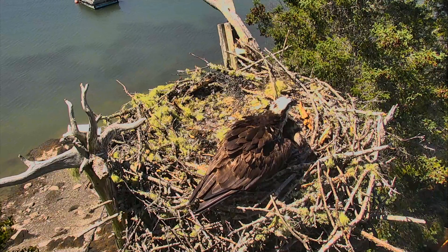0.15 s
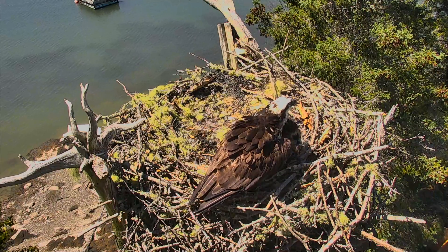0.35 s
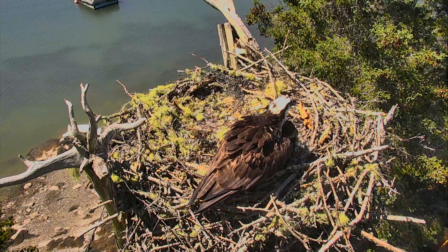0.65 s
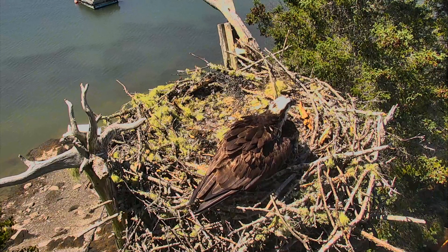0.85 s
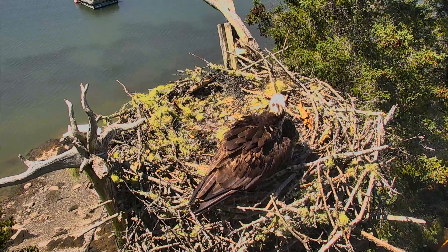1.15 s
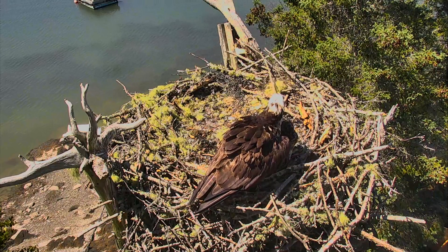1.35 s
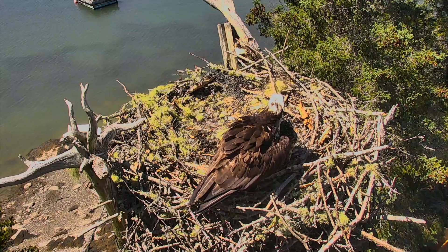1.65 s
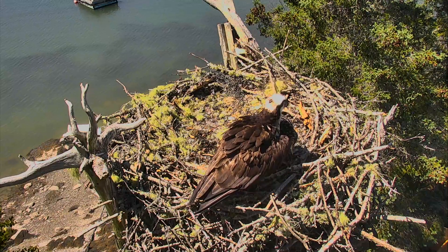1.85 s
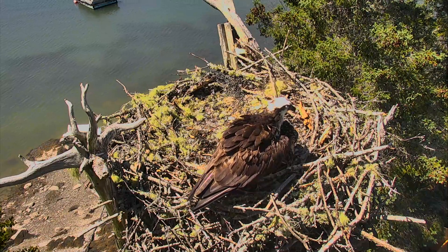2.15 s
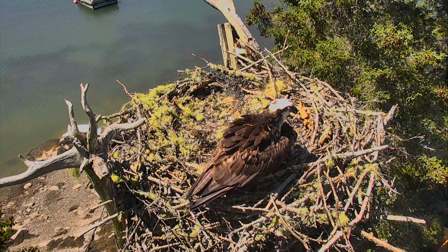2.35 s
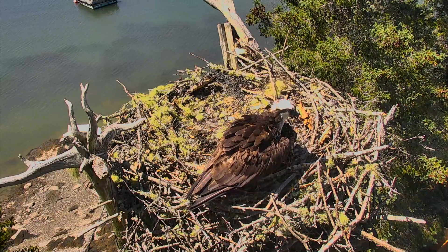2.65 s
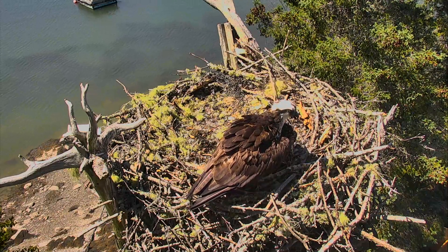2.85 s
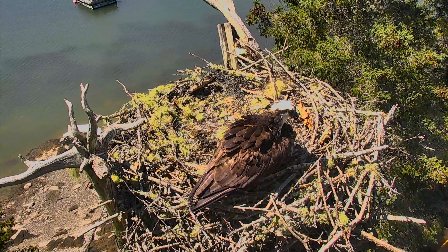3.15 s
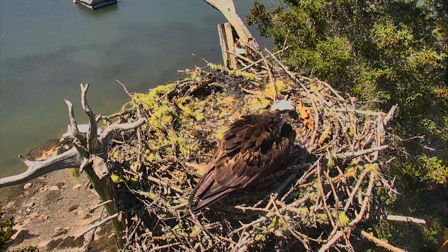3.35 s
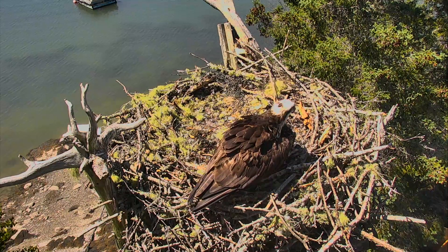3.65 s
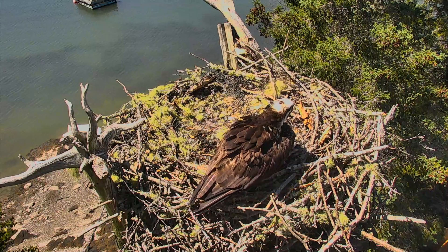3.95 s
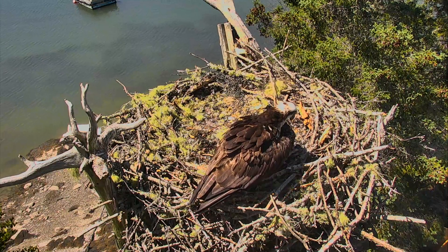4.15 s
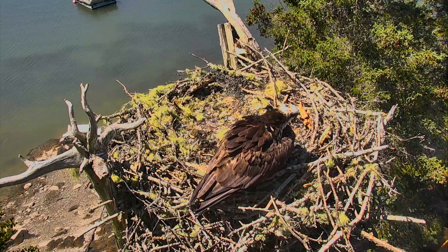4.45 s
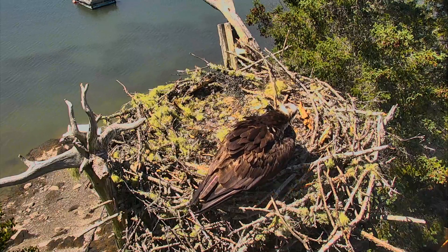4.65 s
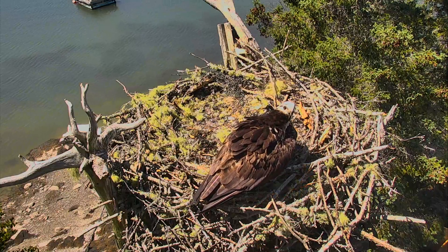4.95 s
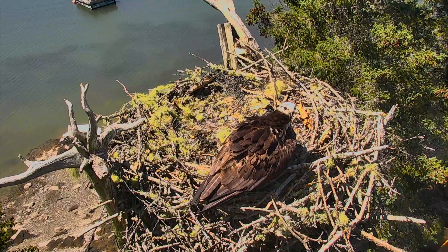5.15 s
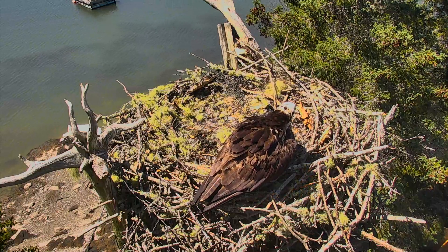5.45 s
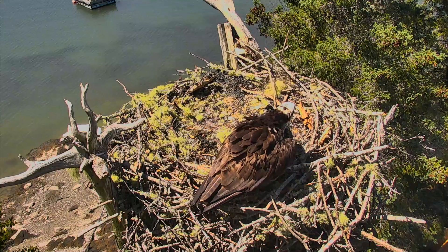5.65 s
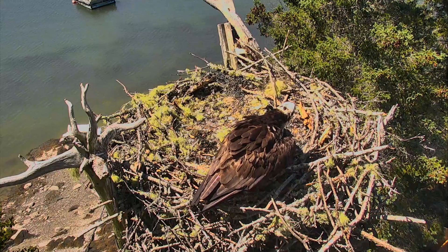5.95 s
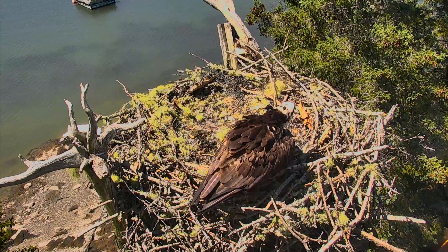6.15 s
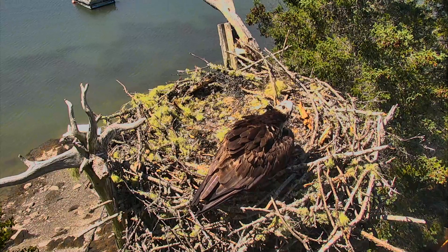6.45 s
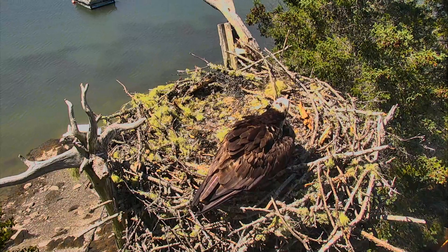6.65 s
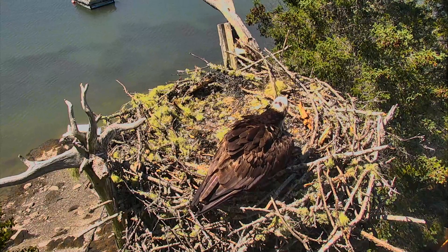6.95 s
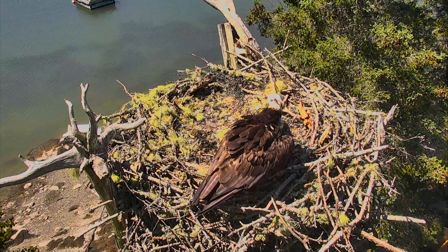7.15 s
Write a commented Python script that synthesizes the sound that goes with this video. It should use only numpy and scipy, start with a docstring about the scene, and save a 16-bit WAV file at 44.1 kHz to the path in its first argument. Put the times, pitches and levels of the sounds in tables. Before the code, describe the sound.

Close outdoors, an osprey on its stick nest calls about four times a second throughout. Each call pairs a brief soft reedy note that breaks upward with a louder, sharp whistle less than a tenth of a second later. The first calls are weak, then they grow loud, piercing and rougher. A crisp short echo follows each one, over faint low hum, soft air and light wind.

```python
"""An osprey on its nest above the shore calls about four times a second, with unevenly growing strain.
Each call is a soft harmonic tone that breaks upward, a click of shaped noise, and a loud whistle that
swells twice as its pitch crosses a throat resonance; hiss and thin sliding squeaks join in.
Delays and decaying noise give one clear echo, two much fainter later ones and a short tail; drifting
sines make a low hum, coloured noise the air, wind and nest rustle, and faint sliding tones the far birds."""
import sys
import numpy as np
from scipy import signal
from scipy.fft import rfft, irfft
from scipy.io import wavfile
from scipy.ndimage import uniform_filter1d

SR = 44100
rng = np.random.default_rng(int(sys.argv[2]) if len(sys.argv) > 2 else 0)


def pcm_store(signal):
    """Save signal as 16-bit PCM."""
    levels = np.round(np.clip(np.atleast_2d(signal), -1, 1) * 32767)
    wavfile.write(sys.argv[1], SR, levels.astype(np.int16).T)


N = 321489
TIME = np.arange(N) / SR

# Partials of the hum. Each row: frequency in Hz, level at mid-scene in dB.
HUM = [(29.5, -52), (58.3, -48), (117.3, -47), (142, -57.5), (173, -53), (199, -65), (237, -60.5),
       (255, -57), (361, -59), (451, -61)]
# Spectrum of still air. Each row: frequency in Hz, relative density in dB per Hz.
AIR = [(20, -2), (45, -6), (80, -2), (130, 0), (240, -1), (400, -9), (600, -16.5), (1000, -21.5),
       (1500, -26), (2500, -33), (4500, -40.5), (9000, -44.5), (13000, -49), (17000, -51.5)]
# Spectrum of wind noise. Each row: frequency in Hz, relative density in dB per Hz.
WIND_COLOUR = [(15, -1), (30, 7.5), (50, -6), (90, -17.5), (300, -65)]
# Gusts of wind. Each row: centre in seconds, length in seconds, peak level in dB.
GUSTS = [(1.38, .2, -46), (5.22, 0.13, -40), (6.82, 0.17, -37), (7.18, 0.47, -39.5)]
# Strain of the voice, limited to 0-1 in use. Each row: time in seconds, roughness as a fraction.
STRAIN = [(0, 0), (.5, 0.27), (1.1, 0.29), (2, 0.19), (4, 0.2), (4.85, 0.53), (5.15, 0.22), (5.8, 0.39),
          (6.5, 1.01), (6.95, 0.28), (7.29, 0.81)]
# Soft notes. Each row: start in seconds, length in seconds, starting pitch in Hz,
# nominal level before the break in dB, nominal level after it in dB.
SOFT_NOTES = [(0.121, 0.055, 1458, -33, -60), (0.411, 0.028, 1450, -43.5, -55),
              (0.694, 0.031, 1509, -29, -33), (.957, 0.032, 1535, -29, -22.5),
              (1.216, 0.022, 1430, -29.5, -61), (1.492, .029, 1455, -29.5, -48),
              (1.765, .031, 1509, -26, -22.5), (2.04, .037, 1585, -24.5, -26),
              (2.286, .035, 1576, -23.5, -20.5), (2.531, 0.035, 1629, -24, -23),
              (2.778, 0.039, 1635, -23.5, -26), (3.024, 0.036, 1628, -24, -21.5),
              (3.283, 0.036, 1550, -25, -21), (3.535, 0.037, 1617, -23.5, -23.5),
              (3.795, .038, 1614, -23.5, -25), (4.051, 0.032, 1596, -25.5, -22.5),
              (4.301, 0.038, 1620, -25.5, -21), (4.555, 0.034, 1687, -28, -14.5),
              (4.805, 0.036, 1675, -28.5, -15), (5.046, .036, 1636, -24, -20.5),
              (5.28, 0.037, 1730, -27, -14.5), (5.523, .033, 1690, -27, -20.5),
              (5.758, 0.034, 1780, -28, -17), (5.984, 0.038, 1813, -30, -16.5),
              (6.206, 0.042, 1860, -27, -17), (6.429, .046, 1868, -27, -17),
              (6.664, 0.037, 1690, -25.5, -13.5), (6.901, 0.032, 1622, -25.5, -18.5),
              (7.129, 0.043, 1780, -26, -17)]
# Growing boldness of the soft note. Each row: time in seconds, climb before the break in Hz per second,
# leap above the starting pitch in Hz, lag of the full voice in seconds, lift of the second harmonic in dB.
BOLDNESS = [(.15, 0, 716, 0.015, -2), (.5, 2000, 734, 0.0094, -1), (1, 7003, 742, 0.0045, 4),
            (2.1, 11501.5, 844, 0.0046, 4), (4.2, 11498.5, 954, .005, 6), (5.1, 11498.5, 1068, 0.0032, 2),
            (5.8, 13005, 1017, 0.0044, 9.5), (6.4, 14004, 1135, 0.0052, 5), (7.1, 12002, 1244, 0.0037, 4.5)]
# Overtone colour of the soft note. Each row: frequency in Hz, gain in dB.
SOFT_COLOUR = [(2800, -13.5), (3500, -17.5), (4300, -31), (5300, -15), (6800, -24.5), (7600, -30.5),
               (8700, -27), (10500, -54), (16500, -60)]
# Air noise that goes with the voice. Each row: frequency in Hz, relative density in dB per Hz.
RASP = [(500, -26), (1200, -22.5), (1700, -3.5), (2400, 6), (3500, 3.5), (4200, -16.5), (5500, -12.5),
        (7500, -9.5), (10200, -16), (11000, -24), (16500, -38)]
# Click that starts a note. Each row: frequency in Hz, relative density in dB per Hz.
CLICK = [(300, -20), (800, -0.5), (1200, -10.5), (1600, 7), (2700, 1.5), (4400, -26.5), (5400, -10.5),
         (7500, -31), (10000, -39), (16500, -41.5)]
# Echo paths. Each row: delay in seconds, gain before colouring in dB.
ECHOES = [(0.037, 0.5), (.0665, -18.5), (.083, -21.5)]
# Reflection from bank and trees. Each row: frequency in Hz, gain in dB.
ECHO_COLOUR = [(1000, -24.5), (1600, -24.5), (2300, -16.5), (2750, -22.5), (3050, -30.5), (3500, -24),
               (4600, -29), (6300, -30.5), (12000, -29.5)]
# Colour of the scattered tail. Each row: frequency in Hz, gain in dB.
TAIL_COLOUR = [(1000, -34), (2300, -24.5), (3000, -34), (3400, -28), (4300, -33.5), (5500, -21),
               (6100, -27), (6600, -19.5), (7600, -32), (12000, -35.5)]
# Hiss of air in the throat. Each row: frequency in Hz, relative density in dB per Hz.
HISS_COLOUR = [(3500, -22), (4800, -1), (5600, 0.5), (7000, -7.5), (9000, -19), (11500, -36), (16500, -50)]
# Loud whistles. Each row: first swell in seconds, its pitch in Hz, its nominal level in dB,
# delay to the second swell in seconds, pitch of the second swell in Hz.
LOUD_NOTES = [(0.203, 2134, -23, 0.0092, 2350), (.497, 2770, -23, .011, 2345),
              (0.7806, 2720, -16.5, 0.0084, 2460), (1.0432, 2973, -15.5, 0.013, 2860),
              (1.3017, 2807, -12.5, 0.013, 2484), (1.574, 2700, -12, 0.01, 2620),
              (1.846, 2837, -6, 0.0094, 2970), (2.12, 3047, -7.5, 0.013, 3103),
              (2.3655, 2856, -6, .01, 2980), (2.6085, 2980, -4.5, .013, 3124),
              (2.8573, 3078, -4, .013, 3136), (3.104, 3090, -7, 0.013, 3160),
              (3.365, 3040, -3.5, 0.013, 3100), (3.6124, 3093, -5, 0.013, 3160),
              (3.8754, 3046, -4.5, 0.012, 3105), (4.1281, 3020, -7, 0.014, 3091),
              (4.3824, 3097, -6.5, 0.014, 3070), (4.6326, 3093, -5.5, 0.014, 3154),
              (4.8876, 3206, -13.5, 0.013, 3310), (5.123, 3048, -3, .012, 3080),
              (5.3577, 3050, -2, 0.012, 3163), (5.598, 3040, -3, 0.013, 3174),
              (5.835, 3070, -8, 0.011, 3216), (6.06, 3120, -9.5, .011, 3154),
              (6.2849, 3105, -6, 0.012, 3140), (6.5097, 3270, -12.5, 0.012, 3043),
              (6.7495, 3190, -12.5, 0.01, 3217), (6.9784, 3210, -3, 0.013, 3180),
              (7.2093, 3326, -10, .016, 3344)]
# Changing shape of the whistle. Each row: time in seconds, overshoot of the pitch crest in Hz,
# width of the first swell in seconds, then in dB the nominal levels of the second swell and the crest,
# and the gains of the second harmonic and the higher harmonics.
WHISTLE_SHAPE = [(.2, 136, 0.011, -21.5, -32, -30, -59), (.5, 140, 0.0091, -29.5, -34, -19, -42.5),
                 (1.45, 261, .011, -20.5, -21.5, -21.5, -34),
                 (1.85, 331, 0.0063, -13.5, -29.5, -19.5, -39.5),
                 (2.7, 421, 0.006, -10.5, -33, -20.5, -42.5), (3.88, 400, 0.0051, -11, -32.5, -20, -36.5),
                 (4.12, 1255, 0.0042, -10.5, -34.5, -22, -30), (4.88, 1228, 0.0038, -13, -33.5, -20.5, -31),
                 (5.4, 1397, 0.0054, -10.5, -42, -20, -31.5), (6.25, 1369, 0.0038, -13.5, -30.5, -21, -29),
                 (7.2, 1323, 0.0044, -14.5, -32, -30.5, -27)]
# Throat resonance on the whistle's second harmonic. Each row: frequency in Hz, gain in dB.
OCTAVE_COLOUR = [(4400, -7), (5400, 3.5), (6000, -4), (6450, 3), (7100, -7.5), (9000, -8.5)]
# Colour of the whistle above its second harmonic. Each row: frequency in Hz, gain in dB.
WHISTLE_COLOUR = [(7000, -3.5), (8500, -4), (9400, -9), (10200, -8), (10900, -17), (12800, -18),
                  (14200, -24.5), (15300, -23.5), (17000, -22)]
# Envelope of a soft rustle. Each row: time in seconds, level in dB.
RUSTLE = [(.2, -91), (.29, -62), (.39, -66), (.47, -88)]
# Spectrum of dry nest material. Each row: frequency in Hz, relative density in dB per Hz.
RUSTLE_COLOUR = [(1000, -4), (2500, 1), (5000, -3.5), (10000, -6), (12000, -30), (17000, -24)]
# Twigs ticking in the nest. Each row: centre in seconds, level in dB.
TWIGS = [(4.982, -55.5), (5.421, -53), (5.49, -51)]
# Faint far hoot. Each row: start in seconds, length in seconds, first and last pitch in Hz, peak level in dB.
FAR_HOOT = [(1.495, 0.073, 760, 745, -49.5)]
# Far small bird. Each row: start in seconds, length in seconds, first and last pitch in Hz, peak level in dB.
FAR_BIRD = [(2.74, 0.091, 4430, 3740, -59), (4.484, 0.068, 4530, 3580, -57),
            (5.223, 0.051, 5450, 4860, -63.5)]

HUM_FADE_DB_PER_S = -.4   # the hum slowly recedes
BREEZE_DB, BREEZE_SWING_DB = -50.5, 2.5
# a soft note at the usual pitch breaks after this time; a higher one breaks sooner, by a power law
USUAL_HZ, BREAK_AFTER_S, BREAK_POWER = 1620, 0.016, 2.78
WARM_UP_S, COLD_LINGER = 0.26, 0.58   # the voice starts cold: its first note lingers before the break
SOFT_CLICK_DB, SOFT_CLICK_DB_PER_S = -32, 0.79   # grows through the bout
SOFT_CLICK_LEAD_S = .0015   # notes below the usual pitch click this much earlier
TAIL_T60_S = 0.39
HISS_LEAD_S, HISS_S, HISS_DB, HISS_STRAIN_DB = .011, 0.0076, -52, 13.5
CLICK_LEAD_S = 0.0113   # the click comes this long before the first swell
CLICK_DB, CLICK_DB_PER_HZ = -33.5, -0.0004   # weakens very slightly with the overshoot
# the resonance lifts mainly the fundamental, so weaker whistles are richer in harmonics
USUAL_WHISTLE_DB, WEAK_RICHNESS = -6, 0.66
SQUEAK_HZ, SQUEAK_SPREAD_DB = 5240, 3
SQUEAKS_FROM_S = 0.76   # the first, gentle calls have almost no squeak
# one squeak rises after the soft note and fades with strain; late in the bout it is fainter
RISING_AFTER_S, RISING_SLIDE_HZ, RISING_DB, RISING_STRAIN_DB = 0.011, 900, -34.5, -20
RISING_UNTIL_S, RISING_LATE_DB = 4.6, -9.5
# another falls just before the whistle and grows with strain
FALLING_LEAD_S, FALLING_SLIDE_HZ, FALLING_DB, FALLING_STRAIN_DB = .015, -800, -51.5, 13
STOPBAND_HZ = 17600


def from_db(db):
    """Level law: 20 dB is a factor of ten in amplitude."""
    return 10 ** (np.asarray(db) / 20)


def rms_one(x):
    """Power normalisation: scale to a root-mean-square of 1."""
    return x / np.sqrt(np.mean(x ** 2) + 1e-20)


def in_time(rows):
    """Linear interpolation of a curve at every sample."""
    return np.interp(TIME, *np.transpose(rows))


def at_time(rows, s):
    """Linear interpolation of each column at one moment."""
    times, *columns = np.transpose(rows)
    return [np.interp(s, times, column) for column in columns]


def at_hz(points, hz):
    """Spectral interpolation on a log-frequency axis."""
    known_hz, db = np.transpose(points)
    return np.interp(np.log(np.maximum(hz, 1)), np.log(known_hz), db)


def coloured(x, spectrum):
    """Linear filtering: a gain for each frequency."""
    gain = from_db(at_hz(spectrum, np.fft.rfftfreq(N, 1 / SR)))
    return irfft(rfft(x) * gain, N)


def noise(spectrum):
    """Spectral shaping of white noise, rms 1."""
    return rms_one(coloured(rng.standard_normal(N), spectrum))


def drift(rate_hz):
    """Band-limited random wander: up to about the given rate, rms 1."""
    position = TIME * 2 * rate_hz
    points = rng.standard_normal(int(position[-1]) + 2)
    return rms_one(np.interp(position, np.arange(len(points)), points))


def near(s):
    """Time windowing: the samples around s, and their times counted from s."""
    first, last = max(int((s - .03) * SR), 0), min(int((s + .09) * SR), N)
    span = slice(first, last)
    return span, TIME[span] - s


def swell(t, width, shape=2):
    """Bell-shaped envelope: about 9 dB down at the edges of its width."""
    return np.exp(-np.abs(2 * t / width) ** shape)


def step(t, rise):
    """Smooth gating: a rise from 0 to 1 centred on zero time."""
    return .5 + .5 * np.tanh(t / rise)


def glide(t, knots):
    """Continuous pitch change: (s, Hz) knots joined with rounded corners."""
    s, hz = np.transpose(knots)
    return uniform_filter1d(np.interp(t, np.maximum.accumulate(s), hz), size=60)


def phase_of(hz):
    """Frequency modulation: phase is the running integral of frequency."""
    return 2 * np.pi * np.cumsum(hz) / SR


def background(air_db=-44.0, waver=.25):
    """Additive and subtractive synthesis: wavering hum partials over noise of still air and wind."""
    hum = np.zeros(N)
    for hz, db in HUM:
        level = from_db(db) * np.sqrt(2) * (1 + waver * drift(5))
        hum += level * np.sin(phase_of(hz + .8 * drift(3)))
    receding = from_db(HUM_FADE_DB_PER_S * (TIME - TIME.mean()))
    return hum * receding + from_db(air_db) * noise(AIR) + wind() * noise(WIND_COLOUR)


def wind():
    """Turbulence as amplitude modulation: a wandering breeze and a few gusts."""
    breeze = from_db(BREEZE_DB + BREEZE_SWING_DB * drift(2))
    return breeze + sum(from_db(db) * swell(TIME - s, length) for s, length, db in GUSTS)


def soft_notes(strain, jitter=.011, strain_jitter=0.016, rasp_db=-24, upper_rasp_db=-31,
               upper_overtones_db=-8, rise_db=5, sag_db=13, growl_db=-17, growl_strain_db=8,
               deep_growl_db=-28, bright_db=7, upper_bright_db=-2, hesitant_db=-7, fade_dull_db=-6):
    """Register break: a low reedy note grows and climbs, leaps to a purer upper register and sags."""
    out, rasp, click = np.zeros(N), noise(RASP), noise(CLICK)
    wobble = 1 + (jitter + strain_jitter * strain ** 2) * drift(900)
    tremor = rattle(strain, depth=0.057, rate_hz=670)
    uneven = 0.49 + 0.92 * drift(180)
    k = np.arange(2, 9)[:, None]   # harmonic numbers
    for s, length, start_hz, low_db, upper_db in SOFT_NOTES:
        span, t = near(s)
        leap, end_hz, upper_hz, lag, octave_db = soft_shape(s, start_hz)
        effort = strain[span] - .35

        growth_db = rise_db * (np.clip(t / leap, 0, .8) - .5)
        hesitation_db = hesitant_db * step(lag - t, 0.0005)
        low = from_db(low_db + growth_db + hesitation_db)
        low = low * step(t - .001, .001) * step(leap - t, 0.0025)
        fading = np.clip((t - leap) / max(length - leap, .002), 0, 1) ** 2
        upper = from_db(upper_db - sag_db * fading)
        upper = upper * step(t - leap - .001, 0.0016) * step(length - t, 0.0033)

        after_break_hz = end_hz * (1.045 + 0.067 * strain[span][0])
        low_hz = glide(t, [(.004, start_hz), (leap - .004, end_hz), (leap + .003, after_break_hz)])
        sag = 0.055 * fading + 0.13 * fading ** 3
        high_hz = upper_hz * (1.015 - sag - .07 * swell(t - leap, .007))
        low_phase, high_phase = phase_of(low_hz * wobble[span]), phase_of(high_hz * wobble[span])

        low_overtones_db = bright_db * effort + octave_db * (k == 2)
        high_overtones_db = upper_overtones_db + upper_bright_db * effort + fade_dull_db * fading
        registers = ((low, low_hz, low_phase, low_overtones_db),
                     (upper, high_hz, high_phase, high_overtones_db))
        for level, hz, phase, overtones_db in registers:
            gain = from_db(at_hz(SOFT_COLOUR, k * hz) + overtones_db) * (k * hz < SR / 2)
            overtones = (gain * np.sin(k * phase)).sum(axis=0)
            out[span] += np.sqrt(2) * level * tremor[span] * (np.sin(phase) + overtones)

        # strong and weak cycles alternate in the low register: half harmonics
        growl = from_db(growl_db + growl_strain_db * effort) * np.sin(low_phase + low_phase / 2)
        deep_growl = from_db(deep_growl_db) * np.sin(low_phase / 2)
        out[span] += low * uneven[span] * (growl + deep_growl)
        breath = low * from_db(rasp_db) + upper * from_db(upper_rasp_db)
        out[span] += rasp[span] * breath * (.5 + 2 * strain[span])
        click_t = t - .001 + SOFT_CLICK_LEAD_S * (start_hz < USUAL_HZ)
        click_level = from_db(SOFT_CLICK_DB + SOFT_CLICK_DB_PER_S * s)
        out[span] += click[span] * click_level * swell(click_t, 0.0043, 5)
    return out


def soft_shape(s, start_hz):
    """Register timing: break time, pitches before and after, voice lag and second-harmonic lift."""
    climb, leap_hz, lag, octave_db = at_time(BOLDNESS, s)
    leap = BREAK_AFTER_S * (USUAL_HZ / start_hz) ** BREAK_POWER * (1 + COLD_LINGER * coldness(s))
    return leap, start_hz + climb * (leap - .008), start_hz + leap_hz, lag, octave_db


def coldness(s):
    """Warm-up decay: 1 at the start of the bout, falling towards 0."""
    return np.exp(-(s / WARM_UP_S) ** 2)


def rattle(strain, depth, rate_hz):
    """Beating: under strain the two sides of the syrinx make an uneven tremor that cuts into the level."""
    beat = np.sin(phase_of(rate_hz * (1 + .25 * drift(120))))
    return (1 + depth * strain * beat) / (1 + 0.75 * depth * strain)


def shore(x):
    """Reflection and scattering: distinct delayed echoes, and a diffuse tail from the trees."""
    t = TIME[:SR]
    scatter = rng.standard_normal(SR) * from_db(-60 * t / TAIL_T60_S) * step(t - .008, .004)
    unit_scatter = scatter / np.sqrt(np.sum(scatter ** 2))
    tail = signal.fftconvolve(x, unit_scatter)[:N]
    echoes = sum(from_db(db) * np.interp(TIME - delay, TIME, x, left=0) for delay, db in ECHOES)
    return coloured(echoes, ECHO_COLOUR) + coloured(tail, TAIL_COLOUR)


def throat_hiss(strain):
    """Turbulent flow: a puff of air noise leads into each whistle, stronger under strain."""
    puffs = np.zeros(N)
    for s, *_ in LOUD_NOTES:
        span, t = near(s - HISS_LEAD_S)
        puffs[span] += swell(t, HISS_S)
    return puffs * from_db(HISS_DB + HISS_STRAIN_DB * strain) * noise(HISS_COLOUR)


def whistles(strain, jitter=0.033, rasp_db=-22, second_width=0.0084, edge_db=-13, edge_rasp_db=-5,
             crest_jitter=0.084, start_jitter=0.11, resonance_hz=330, bright_db=5):
    """Resonance crossing: pitch dips into the throat resonance, overshoots and falls back: two swells."""
    out, rasp, click, wander = np.zeros(N), noise(RASP), noise(CLICK), drift(800)
    tremor = rattle(strain, depth=0.42, rate_hz=400)
    for s, first_hz, first_db, gap, second_hz in LOUD_NOTES:
        span, t = near(s)
        overshoot_hz, width, second_db, crest_db, octave_db, treble_db = at_time(WHISTLE_SHAPE, s)
        rich_db = WEAK_RICHNESS * (USUAL_WHISTLE_DB - first_db)
        crest_hz, start = first_hz + overshoot_hz, -CLICK_LEAD_S
        reach = crest_hz / first_hz - 1   # a high crest comes with a steep start and a deep final fall

        hz = glide(t, [(-.006, first_hz * (1.07 + 0.47 * reach)), (-.002, first_hz * 1.02),
                       (.001, first_hz * .998), (gap - .003, second_hz * 1.025),
                       (gap + .004, second_hz * .985), (gap + 0.01, second_hz * (.74 - .35 * reach))])
        crest = swell(t - gap / 2, .0055, 3.07)
        hz = hz + (crest_hz - (first_hz + second_hz) / 2) * crest
        reach_jitter = reach * (crest_jitter * crest + start_jitter * step(-.003 - t, .001))
        phase = phase_of(hz * (1 + (jitter * strain[span] + reach_jitter) * wander[span]))

        # on the resonance the voice is loud and rich in harmonics; above it the level collapses
        first_swell = from_db(first_db) * swell(t, width, 2.87)
        second_swell = from_db(second_db) * swell(t - gap, second_width, 4.06)
        above_hz = np.maximum(hz - max(first_hz, second_hz), 0)
        swells = (first_swell + second_swell) / (1 + (above_hz / resonance_hz) ** 3)
        octave = from_db(octave_db + rich_db + at_hz(OCTAVE_COLOUR, 2 * hz))
        tone = np.sin(phase) + octave * np.sin(2 * phase)
        for k in range(3, 7):
            gain_db = treble_db + rich_db + at_hz(WHISTLE_COLOUR, k * hz) + bright_db * strain[span]
            tone += from_db(gain_db) * np.sin(k * phase) * (k * hz < SR / 2)

        # off the resonance the voice is thin and breathy
        edge = from_db(second_db + edge_db) * strain[span]
        edge = edge * step(t - start, 0.00047) * step(gap + 0.011 - t, 0.0014)
        thin = edge * (1 - crest) + from_db(crest_db) * crest ** 2
        # the tremor chops the whole tonal voice
        out[span] += np.sqrt(2) * tremor[span] * (swells * tone + thin * np.sin(phase))
        edge_breath = edge * from_db(edge_rasp_db) * step(gap + .007 - t, 0.0054)
        swell_breath = swells * from_db(rasp_db) * strain[span]
        out[span] += rasp[span] * (edge_breath + swell_breath)
        click_level = from_db(CLICK_DB + CLICK_DB_PER_HZ * overshoot_hz)
        out[span] += click[span] * click_level * swell(t - start, 0.0048)
    return out


def nest():
    """Friction and impact noise: dry nest material rustles and ticks."""
    level = from_db(in_time(RUSTLE))
    for s, db in TWIGS:
        span, t = near(s)
        level[span] += from_db(db) * swell(t, .003)
    return level * noise(RUSTLE_COLOUR)


def squeaks(strain, width=0.0042, jitter=0.01):
    """Frequency glide: thin tones slide up after the soft note and down before the whistle."""
    out, wobble = np.zeros(N), 1 + jitter * drift(990)
    slides = []
    for s, length, *_ in SOFT_NOTES:
        rising_db = RISING_DB + RISING_LATE_DB * step(s - RISING_UNTIL_S, .08)
        slides.append((s + length + RISING_AFTER_S, RISING_SLIDE_HZ, rising_db, RISING_STRAIN_DB))
    for s, *_ in LOUD_NOTES:
        slides.append((s - FALLING_LEAD_S, FALLING_SLIDE_HZ, FALLING_DB, FALLING_STRAIN_DB))
    for s, slide_hz, db, strain_db in slides:
        span, t = near(s)
        spread_db = SQUEAK_SPREAD_DB * rng.standard_normal()
        level = from_db(db + strain_db * strain[span] + spread_db) * step(s - SQUEAKS_FROM_S, .15)
        hz = (SQUEAK_HZ + slide_hz * np.tanh(t / width)) * wobble[span]
        out[span] += np.sqrt(2) * level * swell(t, width) * np.sin(phase_of(hz))
    return out


def far_calls(rows, jitter):
    """Gliding sinusoids: faint tones from far birds, with a slightly unsteady pitch."""
    out, wobble = np.zeros(N), 1 + jitter * drift(500)
    for s, length, start_hz, end_hz, db in rows:
        span, t = near(s)
        hz = glide(t, [(0, start_hz), (length, end_hz)]) * wobble[span]
        out[span] += from_db(db) * swell(t - length / 2, length, 4) * np.sin(phase_of(hz))
    return out


def scene():
    """Superposition: the bird close by, its echoes, and the shore behind."""
    strain = np.clip(in_time(STRAIN), 0, 1)
    osprey = soft_notes(strain) + throat_hiss(strain) + whistles(strain) + squeaks(strain)
    far = far_calls(FAR_HOOT, jitter=.008) + far_calls(FAR_BIRD, jitter=.04)
    return (background() + osprey + shore(osprey) + nest() + far)[None]


def record(dry):
    """Amplitude and band limiting: peaks clip at full scale, then a steep low-pass cuts the top."""
    low_pass = signal.cheby2(16, 60, STOPBAND_HZ, fs=SR, output="sos")
    return signal.sosfilt(low_pass, np.clip(dry, -1, 1))


dry = scene()
out = record(dry)
pcm_store(out)
```